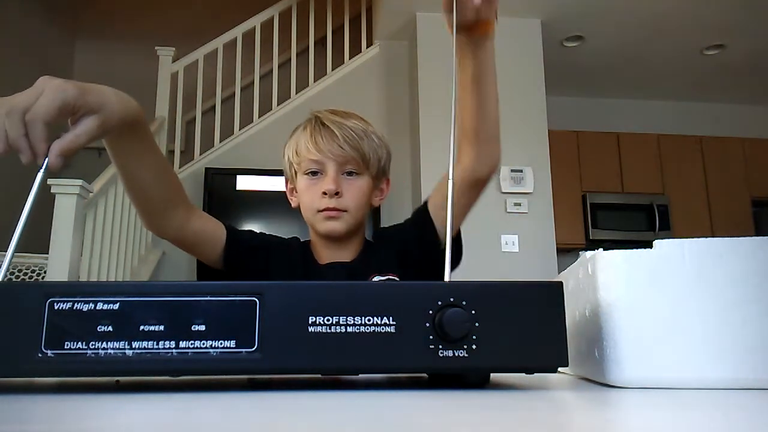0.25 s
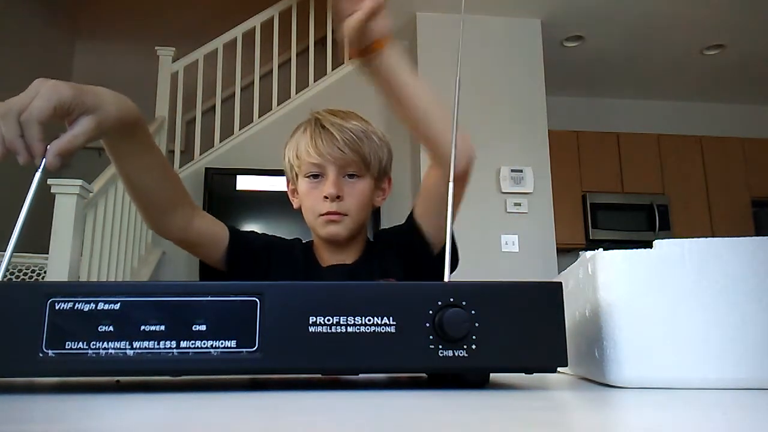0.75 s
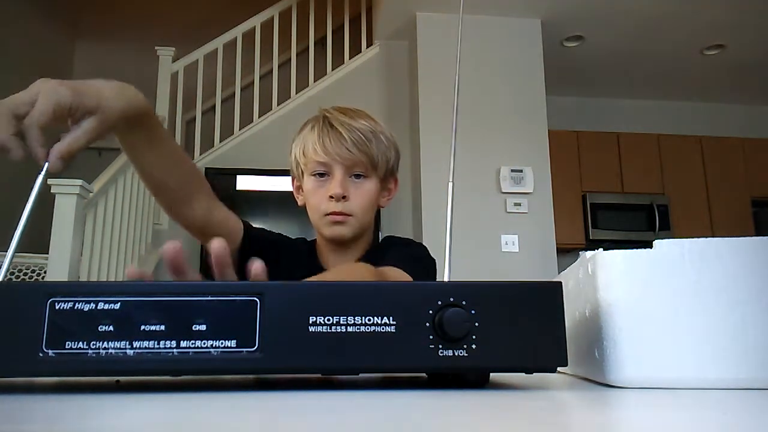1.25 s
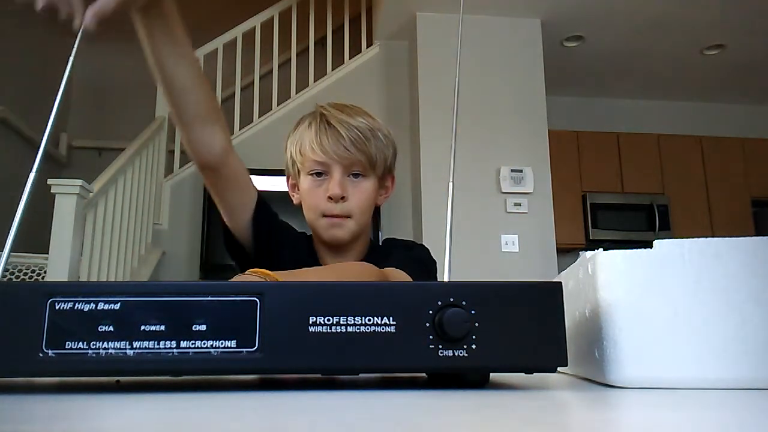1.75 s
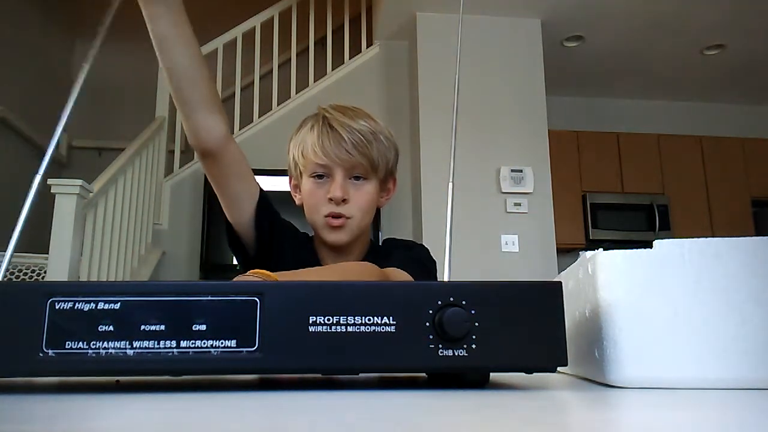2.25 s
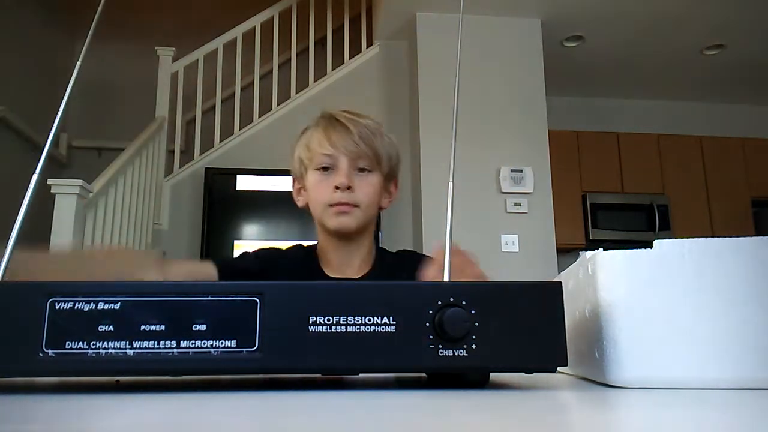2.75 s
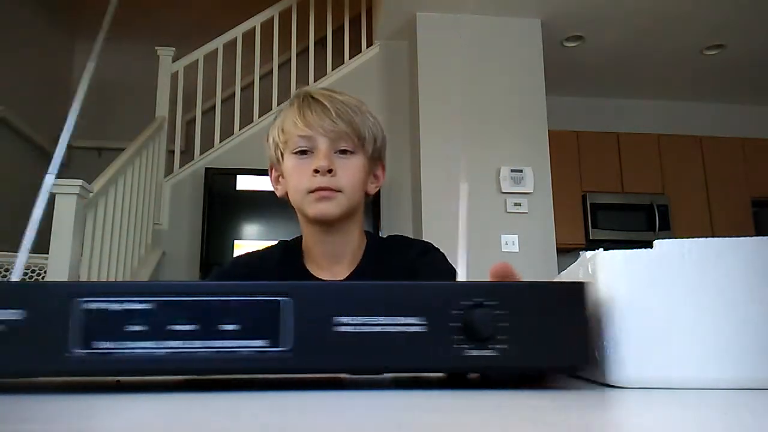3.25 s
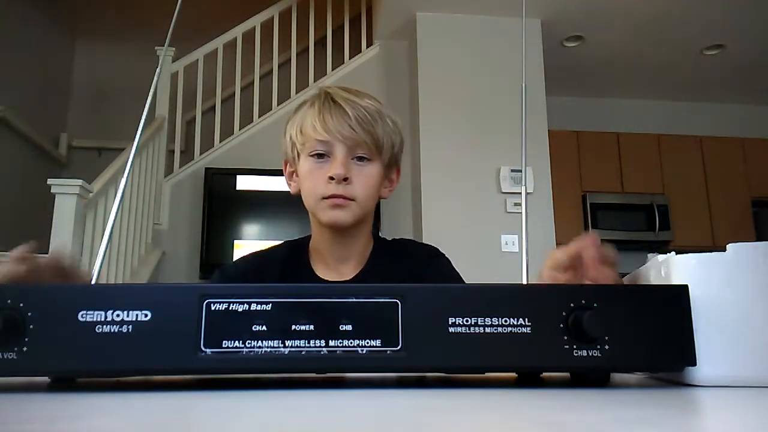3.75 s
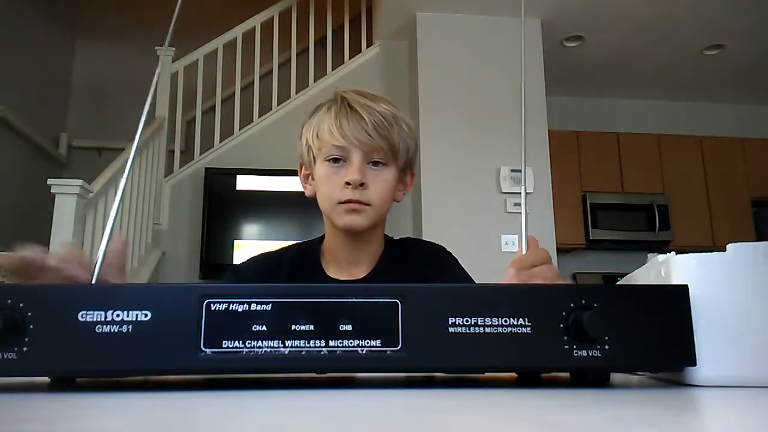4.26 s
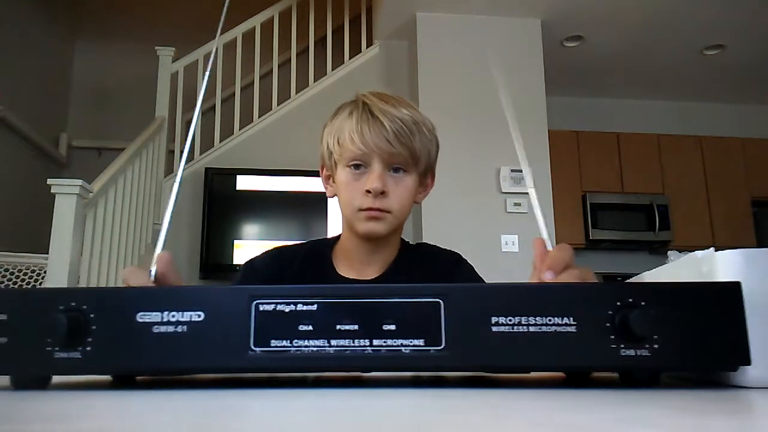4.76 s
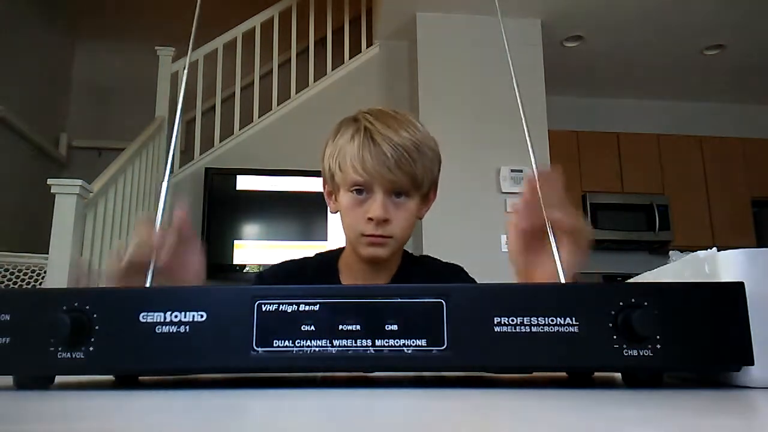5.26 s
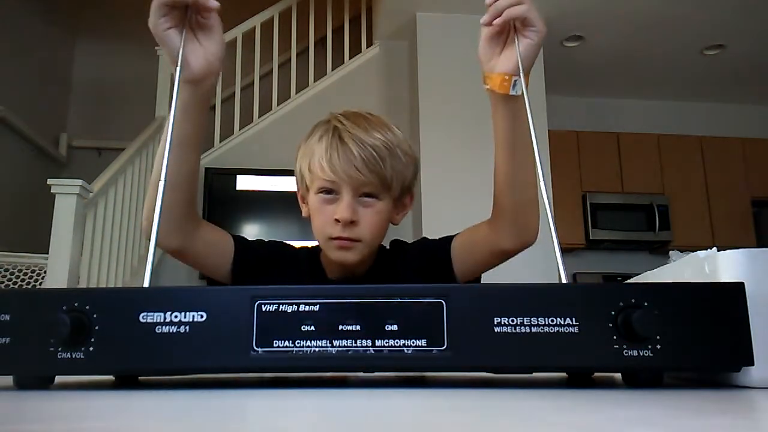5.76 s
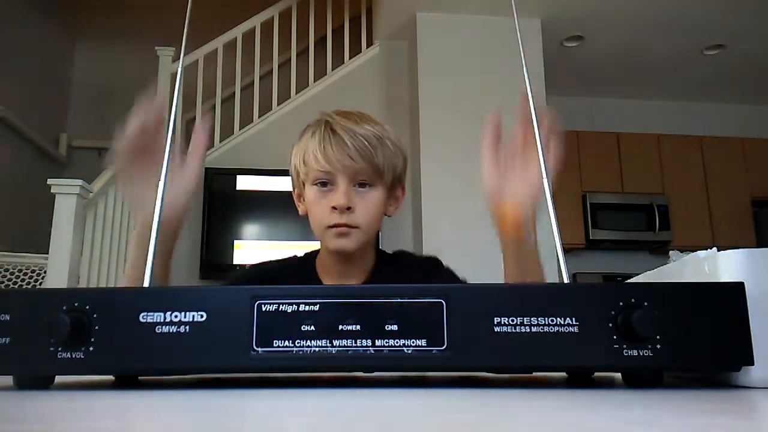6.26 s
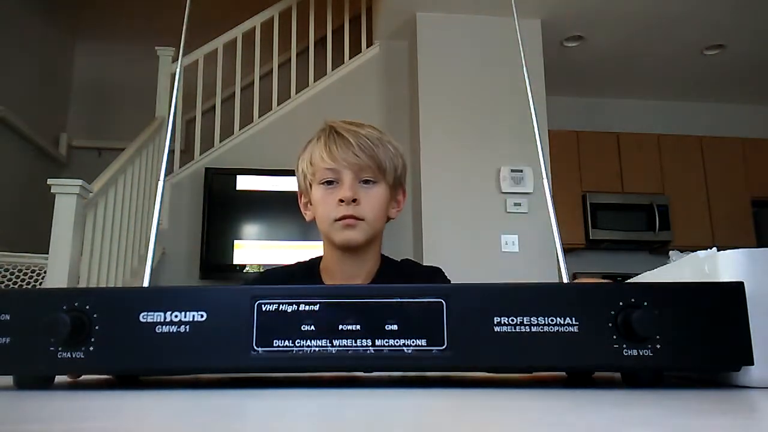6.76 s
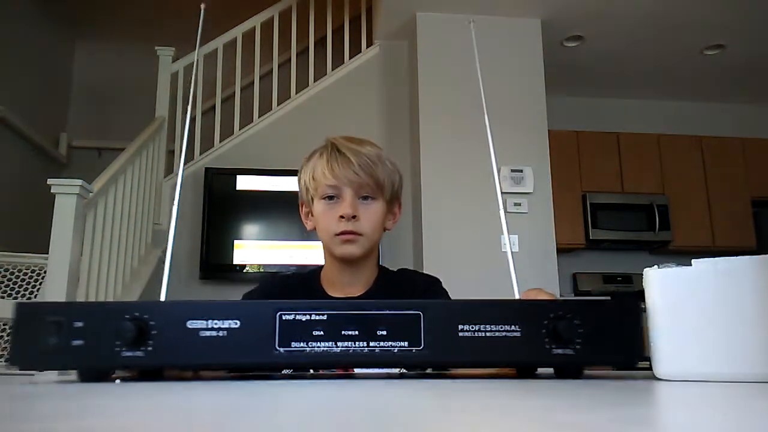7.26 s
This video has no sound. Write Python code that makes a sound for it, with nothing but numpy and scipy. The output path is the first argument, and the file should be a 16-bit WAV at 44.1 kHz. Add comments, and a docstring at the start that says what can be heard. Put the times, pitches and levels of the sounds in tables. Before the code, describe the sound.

Close microphone on a table, indoors with slight room echo. First the bright metallic scraping of tubes sliding in tubes, with thin gliding whistles and clacking stops, a pause with small handling knocks, then another pull in two strokes. Afterwards a hollow metal box hums and rattles under hands, scuffs along the tabletop, squeaks shortly, thuds, quietens, and finally scrapes again.

```python
"""Two telescopic metal rods are pulled out of a thin metal case and tilted by hand; the case is pushed about on a table.
Dense tiny clicks ring the rods one after the other, and gliding whistles sing along. Blows ring case and rods.
The same friction clicks make the case hum and its feet hiss on the table; gliding tones make squeaks.
Noise through a few low modes makes the table top boom. A small room and a steady quiet noise lie around it all."""
import sys
import numpy as np
from scipy import signal
from scipy.fft import rfft, irfft, next_fast_len
from scipy.io import wavfile
from scipy.ndimage import uniform_filter1d

SR = 44100
rng = np.random.default_rng(int(sys.argv[2]) if len(sys.argv) > 2 else 0)


def wrap_up_sound(samples):
    """Save the sound to the file named by the first command line argument, as 16-bit audio."""
    columns = np.atleast_2d(samples).T
    # keep every value between -1 and 1, then stretch to whole-number steps
    tamed = np.clip(columns, -1, 1)
    steps = np.round(tamed * 32767).astype(np.int16)
    wavfile.write(sys.argv[1], SR, steps)


N = 330661
STEP = 40   # samples between the points of a slow curve


def amp(db):
    """Turn dB into a factor."""
    return 10 ** (np.asarray(db) / 20)


def rms_one(x):
    """Scale a sound to rms 1."""
    return x / np.sqrt(np.mean(x ** 2) + 1e-20)


def every_sample(curve):
    """Draw straight lines between the points of a slow curve."""
    return np.interp(np.arange(N) / STEP, np.arange(len(curve)), curve)


def drift(rate):
    """Slow smooth chance with spread 1; a higher rate (Hz) moves faster."""
    r = np.exp(-2 * np.pi * STEP * rate / SR)
    slow = signal.lfilter([1], [1, -2 * r, r * r], rng.standard_normal(N // STEP + 2002))[2000:]
    return every_sample(rms_one(slow))


def in_time(tables):
    """Columns of several tables on one time line; the last result is a gate, open inside a table, with short fades."""
    t, columns_in_time, gate = np.arange(N) / SR, 0, 0
    for rows in tables:
        s, *columns = np.transpose(rows)
        inside = (t >= s[0]) & (t <= s[-1])
        columns_in_time = columns_in_time + inside * np.array([np.interp(t, s, c) for c in columns])
        gate = gate + inside
    faded = uniform_filter1d(gate * 1., size=177, mode="nearest") ** 2 * gate
    return *columns_in_time, faded


RISE_DB = 15.5   # a gesture starts this far below its full level


def gestures(start_s, rise_s, hold_s, level_db, sag_db_per_s, release_db_per_s):
    """One envelope per row: a rise, a sagging hold and a release, all straight in dB."""
    late = np.arange(0, N + STEP, STEP) / SR - np.reshape(start_s, (-1, 1))
    rise, hold, level, sag = (np.reshape(v, (-1, 1)) for v in (rise_s, hold_s, level_db, sag_db_per_s))
    rise, hold = np.maximum(rise, .002), abs(hold)
    rising = RISE_DB * np.clip(1 - late / rise, 0, 1)
    sagging = sag * np.clip(late - rise, 0, hold)
    releasing = release_db_per_s * np.maximum(late - rise - hold, 0)
    return amp(level - rising - sagging - releasing) * (late >= 0)


def blend(envelopes, idle_db, column):
    """Envelopes add in power over an idle level; a column follows the loudest gesture."""
    power = np.sum(envelopes ** 2, axis=0) + amp(idle_db) ** 2
    mean = np.sum(envelopes ** 2 * np.reshape(column, (-1, 1)), axis=0) / power
    return [every_sample(np.sqrt(power)), every_sample(mean)]


def ring(force, hz, width_hz):
    """One mode: a unit click sets a sine of about height 1 ringing, which dies sooner if the mode is wide."""
    r, w = np.exp(-np.pi * abs(width_hz) / SR), 2 * np.pi * hz / SR
    return signal.lfilter([0, np.sin(w)], [1, -2 * r * np.cos(w), r * r], force + 1e-18)


def grains(per_s, spread_db):
    """Tiny catches of two rubbing surfaces: random clicks of uneven size, rms 1."""
    sizes = amp(spread_db * np.minimum(rng.exponential(1, N), 4)) * rng.choice([-1, 1], N)
    return rms_one(sizes * (rng.random(N) < per_s / SR))


def coloured(x, spectrum):
    """Shape a sound to a spectrum; rms 1."""
    hz, level_db = np.transpose(spectrum)
    size = next_fast_len(N)
    f = np.arange(size // 2 + 1) * SR / size + 1
    gain = amp(np.interp(np.log(f), np.log(hz), level_db))
    return rms_one(irfft(rfft(x, size) * gain, size)[:N])


def rubbed(modes, force, patchy_db, wander, lean_db=None, order=1):
    """Friction feeds each mode with a strength that wanders as the grip changes; lean_db(hz) shifts the balance,
    order 2 keeps the valleys between the modes dark."""
    rings = []
    for k, (hz, width_hz, db) in enumerate(modes):
        push = force if order == 1 else ring(force, hz, width_hz)
        strength = amp(db + patchy_db * drift(wander))
        rings.append((-1) ** k * strength * rms_one(ring(push, hz, width_hz)))
    norm = np.sqrt(np.mean(sum(rings) ** 2))   # taken before the balance shifts
    return sum(amp(lean_db(mode[0]) if lean_db else 0) * x for mode, x in zip(modes, rings)) / norm


WAVER = .013   # typical share by which the rod modes bend as the tubes rock in each other


def wavering(x):
    """Read a sound a little faster and slower in turn, which bends its pitch."""
    bend = WAVER * drift(8)
    return np.interp(np.arange(N) + np.cumsum(bend - bend.mean()), np.arange(N), x)


# Tube sliding in tube, one list per pull. Each row: time in seconds, then levels in dB of the rod's upper modes,
# its middle modes, its seat modes and the broad rasp of the walls.
PULLS = [
    [(0.0, -53, -61, -48.5, -45.5), (0.15, -55, -56.5, -49, -53.5), (0.358, -50.5, -57.5, -60, -53.5),
     (0.425, -49, -70, -42.5, -52)],
    [(1.42, -93, -75, -53, -85), (1.5, -75, -61.5, -46.5, -73), (1.656, -51, -48.5, -51.5, -47),
     (1.797, -46.5, -49.5, -41.5, -52)],
    [(1.81, -47, -63, -48, -57), (1.92, -54, -85, -49, -61), (2.029, -61, -73, -51, -63),
     (2.255, -53, -59, -49, -74)],
]
# Parts of a rod: seat, middle, upper modes. Each row: from Hz, to Hz.
SECTIONS = [(0, 1500), (1500, 5300), (5300, 20000)]
# The two rods with their seats in the case. Each row: mode in Hz, width in Hz, relative strength in dB.
RIGHT_ROD = [(580, 71, 5), (1000, 130, 4), (3540, 1800, -26), (5920, 360, -9.5), (6714, 620, 4.5),
             (7940, 940, 1), (9550, 360, -12), (12500, 1400, -12.5)]
LEFT_ROD = [(324, 15.7, 2), (900, 250, 1.5), (1044, 270, 4), (1245, 95, -14), (2052, 440, -1.5),
            (2845, 720, 1), (3675, 520, -3.5), (4490, 820, -1), (6830, 860, -9), (8830, 1200, -18),
            (12300, 5800, -20)]
# Colour of friction noise, for tube walls and for feet on the table. Each row: Hz, relative level in dB per Hz.
RUBBING = [(590, -6), (1110, 0.5), (1810, -3.5), (3080, -6.5), (6860, -3.5), (12300, -10.5), (14900, -17.5),
           (16000, -5)]


def pulling():
    """Dense catches ring first one rod, then the other, in three sections with their own levels."""
    upper_db, middle_db, seat_db, rasp_db, gate = in_time(PULLS)
    force = grains(4000 * amp(2.5 * drift(23)), spread_db=-3.0)
    rods = []
    for rod in (RIGHT_ROD, LEFT_ROD):
        seat, middle, upper = ([m for m in rod if low < m[0] <= high] for low, high in SECTIONS)
        seat_ring = wavering(rubbed(seat, force, patchy_db=2.5, wander=24))
        middle_ring = wavering(rubbed(middle, force, patchy_db=3.0, wander=25, order=2))
        upper_ring = wavering(rubbed(upper, force, patchy_db=3.0, wander=26, order=2))
        rods.append(amp(seat_db) * seat_ring + amp(middle_db) * middle_ring + amp(upper_db) * upper_ring)
    rasp = amp(rasp_db) * coloured(force, RUBBING)
    second_pull_s = PULLS[1][0][0]
    return gate * (rasp + np.where(np.arange(N) < second_pull_s * SR, *rods))


# Narrow resonances that sing out and glide with the free length as the tubes slide.
# Each row: start in seconds, end in seconds, first pitch in Hz, last pitch in Hz, level in dB before the flutter.
WHISTLES = [(0.0, 0.048, 2550, 2850, -54), (0.0, 0.058, 3300, 3240, -56), (.14, 0.362, 2750, 2560, -60),
            (.135, 0.191, 4740, 4730, -50.5), (.26, 0.328, 4850, 4800, -58), (.365, 0.382, 4210, 4050, -45),
            (1.701, 1.797, 3810, 3570, -52), (1.86, 2.196, 4550, 4390, -65), (1.9, 2.258, 6420, 6600, -58),
            (1.99, 2.145, 3100, 2700, -64.5), (2.195, 2.256, 4350, 5000, -61)]
WHISTLE_WIDTH_HZ = 190   # width of each of the two smoothing steps


def whistles():
    """Each is a gliding tone smeared by friction into a narrow, fluttering band."""
    out, r = np.zeros(N), np.exp(-np.pi * WHISTLE_WIDTH_HZ / SR)
    flutter = amp(3.2 * drift(30))
    for start_s, end_s, first_hz, last_hz, level_db in WHISTLES:
        a, b = int(max(start_s, 0) * SR), int(end_s * SR)
        # two slow random curves make the tone wander in height and phase
        noise = rng.standard_normal((2, SR // 2))
        re, im = signal.lfilter([1], [1, -2 * r, r * r], noise)[:, -(b - a):]
        phase = 2 * np.pi * np.cumsum(np.linspace(first_hz, last_hz, b - a)) / SR
        fade = signal.windows.tukey(b - a, .3)
        out[a:b] += amp(level_db) * fade * rms_one(re * np.cos(phase) + im * np.sin(phase))
    return flutter * out


# Modes of the case panels, also rung by knocks. Each row: mode in Hz, width in Hz, relative strength in dB.
CASE = [(206.3, 5.7, -7.5), (256.5, 22.6, -0.5), (329.8, 18, -2), (420, 19.6, -5.5), (505, 45, -1.5),
        (622, 48, -2), (750, 86, -4), (905, 91, 0.5), (1115, 71, 1), (1277, 140, 1), (1688, 30, -10)]
# Spells in which the panels hum under a hand. Each row: start in seconds, rise in seconds, hold in seconds,
# level in dB before the shift of balance, sag while held in dB per second, centre of the hum in Hz.
GRIPS = [(0.0, 0.0083, 0.52, -50.5, 13, 624), (1.388, 0.092, 0.83, -51, -3.5, 830),
         (2.295, .03, 0.2, -55, -3, 342), (3.067, 0.029, 0.052, -52, 40, 447),
         (3.203, 0.042, 0.8, -48, 5, 650), (4.298, 0.022, 0.12, -58.5, 45, 420),
         (4.49, 0.021, 0.16, -43.5, 39, 320), (4.725, 0.012, 0.16, -56, 49, 700),
         (5.214, 0.015, 0.043, -48, 45, 380), (6.556, 0.12, 0.096, -46, 22, 750),
         (6.868, 0.17, 0.27, -41, 5.5, 616)]
IDLE_HUM_DB, HUM_RELEASE_DB_PER_S = -83, 102
HUM_FOCUS_DB = 4.5   # loss one octave off the centre


def handling():
    """Every touch keeps the case panels humming, most near the centre pitch of the grip."""
    *shape, centre_hz = np.transpose(GRIPS)
    envelopes = gestures(*shape, HUM_RELEASE_DB_PER_S)
    level, octaves = blend(envelopes, IDLE_HUM_DB, np.log2(centre_hz / 500))
    return level * rubbed(CASE, grains(3000, spread_db=1.5), patchy_db=2.5, wander=11.3,
                          lean_db=lambda hz: -HUM_FOCUS_DB * (np.log2(hz / 500) - octaves) ** 2)


# Steady noise of room and microphone. Each row: Hz, relative level in dB per Hz.
QUIET = [(35, -20), (97, -2), (161, -4.5), (463, -10.5), (911, -13.5), (1230, -19.5), (14800, -27.5),
         (16000, -31)]
QUIET_DB = -65


def quiet_noise():
    """Random noise shaped to a dark spectrum."""
    return amp(QUIET_DB) * coloured(rng.standard_normal(N), QUIET)


# Blows on case and rods. Each row: time in seconds, relative case strength in dB, relative metal tick strength
# in dB, basic contact time in milliseconds, centre of the case ring in Hz.
KNOCKS = [(0.364, -27, -30, 18, 650), (0.428, -17.5, -25.5, 11, 657), (0.671, -51, -76, 3.8, 1200),
          (0.698, -42.5, -84, 2.8, 590), (0.919, -39, -64, 2.2, 660), (1.312, -39.5, -59, 6.2, 1210),
          (1.326, -36.5, -53.5, 17, 403), (1.413, -47, -57, 5, 900), (1.473, -40, -72, 23, 1000),
          (1.68, -52, -42, 2.5, 1000), (1.799, -17.5, -17.5, 7.8, 725), (2.002, -63, -49, 2.5, 1000),
          (2.256, -22.5, -32, 9.1, 710), (2.331, -31.5, -61, 4.9, 282), (3.049, -38, -62, 10, 493),
          (3.289, -36.5, -41.5, 6.9, 700), (3.322, -45, -56, 5, 1300), (3.36, -37, -40, 6, 1300),
          (3.745, -32, -46, 17, 444), (4.281, -41.5, -60, 20, 1150), (4.301, -39.5, -56.5, 8.1, 420),
          (4.501, -35.5, -44, 21, 1180), (4.719, -22, -28.5, 5.8, 600), (5.229, -34.5, -66, 43, 404),
          (5.921, -48, -68, 19, 800), (6.202, -42, -75, 32, 405), (6.536, -33, -69, 3.1, 1000),
          (6.735, -35, -60, 3.8, 670), (6.881, -29.5, -42, 5.3, 1000)]


def struck(modes, peak_db, uneven_db, contact_ms, firm, lean_db):
    """Each knock is a short chatter of contacts that reaches every mode with its own strength."""
    at = np.round(np.array(KNOCKS)[:, 0] * SR).astype(int)
    luck = rng.standard_normal((len(at), len(modes)))
    lag = np.arange(2000)
    fade = np.exp(-lag * 1000 / SR / np.clip(contact_ms, .3, 30)[:, None])
    first_touch = firm * np.sqrt(contact_ms)[:, None] * (lag == 0)
    out = 0
    for k, (hz, width_hz, db) in enumerate(modes):
        chatter = (rng.standard_normal(fade.shape) + first_touch) * fade
        # how well the chatter suits this mode, mostly evened out
        reach = abs(chatter @ np.exp(-2j * np.pi * hz * lag / SR))[:, None]
        size = np.sqrt(np.sum(chatter ** 2, axis=1, keepdims=True))
        chatter /= .7 * reach + .3 * size
        strength_db = peak_db + db + lean_db(hz) + uneven_db * luck[:, k]
        force = np.zeros(N + 2000)
        np.add.at(force, at[:, None] + lag, amp(strength_db)[:, None] * chatter)
        out = out + ring(force[:N], hz, width_hz)
    return out


def knocks():
    """Tube stops and hands strike case and rods; a light blow rings few modes, one with little tick is duller."""
    s, case_db, tick_db, contact_ms, centre_hz = np.transpose(KNOCKS)
    case = struck(CASE, case_db - 5.5, uneven_db=2.0, contact_ms=contact_ms, firm=2.22,
                  lean_db=lambda hz: (-0.5 + 0.21 * case_db) * np.log2(hz / centre_hz) ** 2)
    # higher rod modes, plus one very wide mode for the click itself
    metal = RIGHT_ROD[2:] + LEFT_ROD[4:] + [(3280, 6200, 0.85)]
    ticks = struck(metal, tick_db + 0.5, uneven_db=-0.5, contact_ms=0.71 * contact_ms, firm=1,
                   lean_db=lambda hz: 0.58 * (tick_db - case_db) * np.log2(hz / 4000))
    dull = signal.butter(2, 2200, fs=SR, output="sos")     # panels take up no sharp edge
    soft = signal.butter(2, 9000, fs=SR, output="sos")     # nor do the rods ring at the very top
    return signal.sosfilt(dull, case) + signal.sosfilt(soft, ticks)


def evened(x, size):
    """Take out chance swells, so that the level follows the hands."""
    return rms_one(x / (np.sqrt(uniform_filter1d(x ** 2, size=size)) + 0.16))


# Low modes of the table top. Each row: mode in Hz, width in Hz, relative strength in dB.
TABLE = [(51, 23, -2), (70.6, 4.1, 3), (99.4, 56, -4)]
# Weight landing on the table. Each row: time in seconds (middle of the rise), level in dB, hold in seconds.
LEANS = [(0.38, -46, .03), (0.43, -41, 0.093), (0.752, -55, 0.11), (1.321, -32.5, 0.037),
         (1.814, -62, 0.068), (2.31, -39, 0.04), (2.451, -48, 0.092), (2.918, -48.5, 0.023),
         (3.09, -54, 0.13), (3.406, -50.5, 0.024), (3.73, -48.5, 0.035), (3.891, -52.5, 0.073),
         (4.002, -50, 0.16), (4.402, -44.5, 0.043), (4.5, -47.5, 0.075), (4.712, -35.5, 0.041),
         (4.989, -55, 0.062), (5.257, -53, 0.43), (5.912, -57.5, 0.055), (6.22, -42, 0.027),
         (6.268, -49.5, 0.089), (6.537, -34, 0.034), (6.649, -44, 0.12), (7.002, -46.5, 0.11)]
LEAN_RISE_S, LEAN_SAG_DB_PER_S, LEAN_FALL_DB_PER_S, IDLE_BOOM_DB = 0.009, 14, 167, -65.5


def table_top():
    """Weight landing on the table sets its low modes swinging; noise feeds them, and a faint boom never stops."""
    s, level_db, hold_s = np.transpose(LEANS)
    envelopes = gestures(s - LEAN_RISE_S / 2, LEAN_RISE_S, hold_s, level_db, LEAN_SAG_DB_PER_S,
                         LEAN_FALL_DB_PER_S)
    level = blend(envelopes, IDLE_BOOM_DB, 0)[0]
    return level * evened(rubbed(TABLE, rng.standard_normal(N), patchy_db=0.5, wander=4.4), size=1400)


# What squeaks and drags ring in, a light box beside the case perhaps.
# Each row: mode in Hz, width in Hz, relative strength in dB.
BOX = [(3510, 12, -14), (3910, 40, -8), (4520, 350, -0.5), (5500, 100, -14), (7660, 760, 4.5)]
# Strokes of the case over the table. Each row: start in seconds, rise in seconds, hold in seconds, hiss level in dB
# before tilt and stutter, sag while held in dB per second, tilt in dB (up above 4 kHz, down below).
DRAGS = [(2.474, 0.13, 0.0071, -56.5, 10, 0), (3.009, 0.06, 0.26, -49, 88, -0.5),
         (3.278, 0.015, 0.15, -49.5, -30, -1.5), (3.366, 0.13, 0.33, -43, 13, 0.7),
         (3.868, .01, 0.23, -57.5, 46, -5.5), (4.617, 0.072, 0.066, -50.5, 28, -4.5),
         (4.713, 0.0084, 0.17, -39, 40, -2), (4.864, 0.031, 0.21, -49, 112, 0.5),
         (6.534, 0.0061, 0.094, -46.5, 71, -2.5), (6.633, 0.019, 0.51, -42, 83, -3),
         (6.797, 0.21, .33, -45.5, 14, -3), (7.302, 0.037, 0.17, -48.5, 43, -1)]
DRAG_RELEASE_DB_PER_S = 343


def dragging():
    """Feet and edges hiss on the table in stutters; faster rubbing, set by the tilt, is brighter."""
    *shape, tilt = np.transpose(DRAGS)
    level, tilt_db = blend(gestures(*shape, DRAG_RELEASE_DB_PER_S), -120, tilt)
    grit = amp(2.0 * drift(60)) * grains(6000 * amp(2.5 * drift(30)), spread_db=2.2)
    hiss = coloured(grit, RUBBING) + amp(-12) * rubbed(BOX, grit, patchy_db=5.0, wander=20)
    high = signal.sosfilt(signal.butter(2, 4000, "high", fs=SR, output="sos"), hiss)
    low = signal.sosfilt(signal.butter(2, 4000, "low", fs=SR, output="sos"), hiss)
    return level * (amp(tilt_db + 1.5 * drift(20)) * high - amp(-tilt_db + 2.2 * drift(25)) * low)


# Rubbing squeaks, one list per squeak. Each row: time in seconds, middle slip rate in Hz, relative level in dB.
SQUEAKS = [
    [(3.503, 1954, -44), (3.514, 5510, -32.5), (3.522, 6150, -31.5), (3.533, 4660, -31), (3.543, 3640, -34),
     (3.554, 3570, -34), (3.565, 5850, -28.5), (3.572, 5430, -43), (3.582, 5440, -30)],
    [(3.714, 5000, -42), (3.72, 4500, -39), (3.724, 3000, -47), (3.729, 1400, -46)],
    [(4.648, 3100, -63), (4.665, 2500, -54), (4.68, 1400, -39)],
]


def squeaks():
    """Regular stick and slip: a gliding tone with an octave when slow, unsteady; modes light up as it passes them."""
    hz, db, gate = in_time(SQUEAKS)
    phase = 2 * np.pi * np.cumsum(hz * (1 + 0.05 * drift(300))) / SR
    tone = np.sin(phase) + .4 * (hz < 4000) * np.sin(2 * phase)
    slips = gate * amp(db + 5 * drift(250)) * tone
    box = sum(amp(g) * ring(slips, f, w) for f, w, g in BOX)
    return 0.58 * slips + amp(-26.0) * box


# A foot nearly squeaks and the hiss gathers round one pitch. Each row: start in seconds, rise in seconds,
# hold in seconds, level in dB, sag while held in dB per second, centre in Hz.
SWISHES = [(6.635, 0.013, 0.03, -44, 105, 4600), (6.995, 0.013, 0.09, -37.5, 110, 6200),
           (7.26, 0.046, 0.019, -43.5, 12, 7000), (3.55, 0.017, .08, -45.5, 40, 7400),
           (6.9, 0.093, .5, -58, 5, 13300)]
SWISH_WIDTH_HZ = 3400   # width of the resonance, which is passed twice


def swishes():
    """Dense friction noise twice through one wide resonance."""
    *shape, centre_hz = np.transpose(SWISHES)
    out, force = 0, grains(9000, spread_db=-1.0)
    edges = np.diff(force, prepend=0)   # takes out the bass
    for level, hz in zip(gestures(*shape, DRAG_RELEASE_DB_PER_S), centre_hz):
        band = rms_one(ring(ring(edges, hz, SWISH_WIDTH_HZ), hz, SWISH_WIDTH_HZ))
        out = out + every_sample(level) * band
    return out


ROOM_T60_S, ROOM_DB = 0.37, -19   # time for echoes to fall by 60 dB (sooner in the treble), gain of the echoes
WALL_CUT_HZ = 14000


def room(x):
    """Many feedback delays, duller on every round."""
    size = next_fast_len(N + SR)
    w = 2 * np.pi * np.arange(size // 2 + 1) / size
    dull = 1 / np.sqrt(1 + (w * SR / (2 * np.pi * WALL_CUT_HZ)) ** 2)
    echoes = 0
    for k, lag in enumerate(rng.uniform(.011, .055, size=18)):   # delays in seconds
        loop = amp(-60 * lag / ROOM_T60_S) * dull ** (lag * 20) * np.exp(-1j * w * round(lag * SR))
        echoes = echoes + (-1) ** k * loop / (1 - loop)   # all rounds of one delay
    return irfft(rfft(x, size) * echoes, size)[:N]


def scene():
    """Add all sources; hum, boom and quiet noise get no echo."""
    near = pulling() + whistles() + knocks() + dragging() + squeaks() + swishes()
    return (near + amp(ROOM_DB) * room(near) + handling() + table_top() + quiet_noise())[None]


CUTOFF_HZ = 15600


def record(dry):
    """The microphone loses the deepest bass; the top is cut steeply."""
    thin = signal.sosfilt(signal.butter(3, 38, "high", fs=SR, output="sos"), dry)
    return signal.sosfilt(signal.ellip(12, .5, 70, CUTOFF_HZ, fs=SR, output="sos"), thin)


dry = scene()
out = record(dry)
wrap_up_sound(out)
```